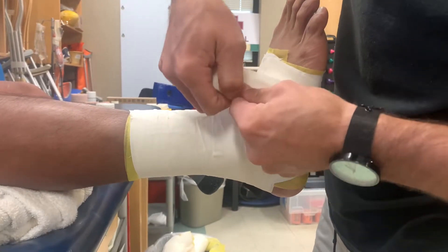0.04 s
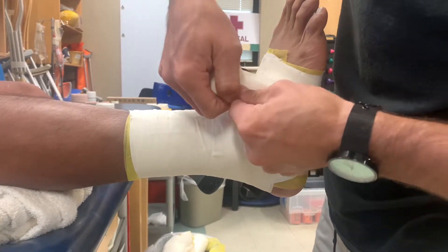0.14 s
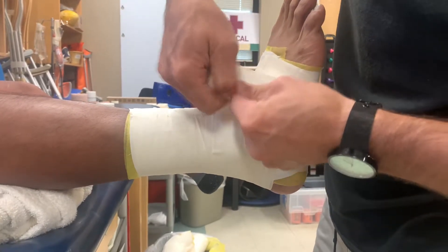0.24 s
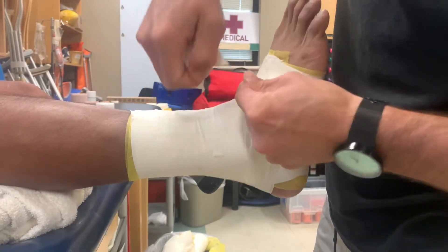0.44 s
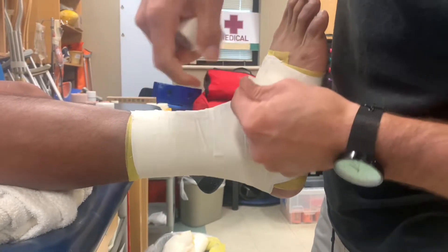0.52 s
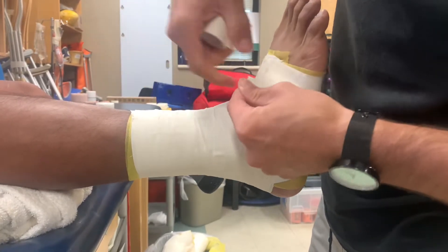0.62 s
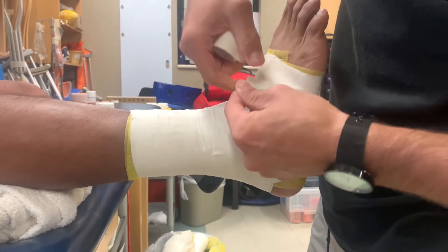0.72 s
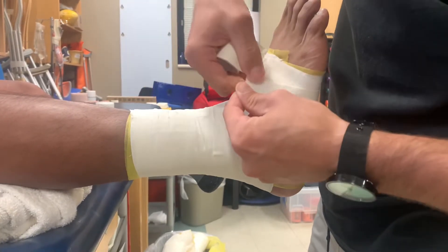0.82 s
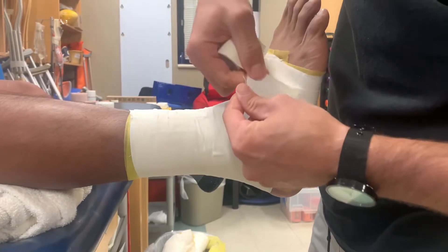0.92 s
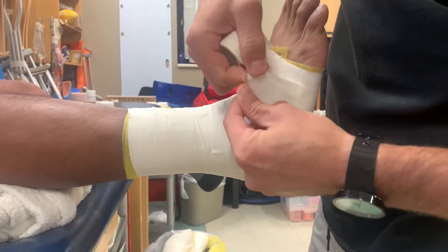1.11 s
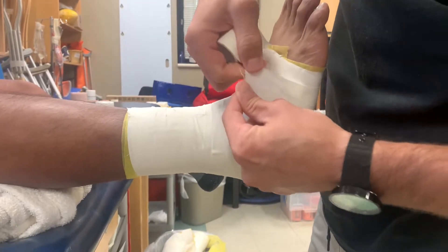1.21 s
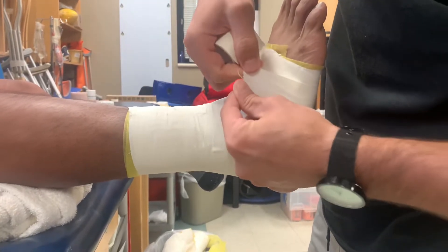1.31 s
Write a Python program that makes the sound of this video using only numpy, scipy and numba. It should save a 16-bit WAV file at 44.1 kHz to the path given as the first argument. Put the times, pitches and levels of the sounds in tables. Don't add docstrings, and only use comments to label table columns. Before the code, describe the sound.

Cloth tape is torn by hand, close to a phone in a small room. Faint thread ticks come at about 0.05 to 0.16 s, then a sharp, crackling rip from 0.19 to 0.26 s, its tone dropping into a soft slap. Finger brushing trails off to about 0.45 s; light rubs and small ticks return from 0.75 to 1.05 s. Low, wavering ventilation rumble continues throughout.

```python
import sys
import numpy as np
from scipy import signal
from scipy.fft import rfft, irfft
from scipy.io import wavfile
from scipy.ndimage import uniform_filter1d
from numba import njit

SR = 44100
rng = np.random.default_rng(int(sys.argv[2]) if len(sys.argv) > 2 else 0)


def inscribe(sig):
    pcm = np.round(np.clip(np.atleast_2d(sig).T, -1, 1) * 32767)
    wavfile.write(sys.argv[1], SR, pcm.astype(np.int16))


def linear_from_db(decibels):
    return 10 ** (np.asarray(decibels, float) / 20)


N = 59535
T = np.arange(N) / SR
HZ = np.fft.rfftfreq(N, 1 / SR)

# [f/Hz, level/dB]
RUMBLE_COLOUR = [(20, -19.5), (35, -15), (65, 2), (85, -5), (160, -7.5), (250, -19.5), (320, -31.5),
                 (800, -53.5)]
# [f/Hz, level/dB]
HISS_COLOUR = [(300, 8), (800, -9), (2500, -9.5), (5000, -16), (7300, -16), (9500, -12.5), (11400, -10),
               (16000, -13)]
# [f/Hz, width/Hz, level/dB]
DUCT_RESONANCES = [
    (144.1, 3.7, -59),
    (11340, 250, -97.5),
]
# [t/s, level/dB]
AIR_FLOW = [(0.0, -75), (0.03, -39), (0.108, -68), (0.124, -41.5), (0.25, -50.5), (0.274, -62),
            (0.378, -41), (0.412, -59), (0.442, -41), (0.654, -45.5), (0.68, -41), (0.808, -49.5),
            (0.852, -41), (0.906, -52.5), (1.124, -39), (1.172, -50.5), (1.21, -43.5), (1.35, -50)]

# [f/Hz, phase ahead/rad, level/dB]
PORTS_TEAR = [(700, .1, -1), (1500, .6, 5), (2550, 3.1, -.5), (3550, 3.2, 0), (4300, 5.6, -3),
              (5400, 3.2, -5), (6800, 6.1, 0), (16000, -6.7, 0)]
# [f/Hz, phase ahead/rad, level/dB]
PORTS_ASIDE = [(600, 0, -1), (1300, 2.4, 4), (3700, 2.6, -1), (4300, 1.8, -3), (5900, 2.4, -6),
               (6900, 5.2, -2), (8500, 3.14, 0), (16000, -6.4, 0)]

# [t/s, length/s, level/dB, brightness/dB per octave]
FINGER_RUBS = [(0.04, 0.0037, -97, -7), (0.12, 0.0097, -71, -2), (0.156, 0.0047, -64.5, -17),
               (0.275, 0.064, -52, -2.5), (0.397, 0.0067, -50, 0), (0.446, 0.037, -93, -1),
               (.74, 0.044, -75.5, -2.5), (0.847, 0.021, -70.5, -5.9), (.862, 0.031, -61, -5.3),
               (0.909, .05, -71.5, 0.9), (0.965, 0.019, -55.5, -1.6), (1.002, 0.017, -75, -2.7),
               (1.035, 0.026, -76, 12)]
# [f/Hz, level/dB]
RUB_COLOUR = [(500, -30), (1100, -13.5), (2500, -3.5), (4500, -4), (7000, -10), (8800, -4), (11000, -4),
              (15700, -1)]
# [t/s, level/dB, f/Hz, ring/s]
TICKS = [
    (.0535, -64.5, 4500, .003),
    (.1285, -62.5, 4500, .004),
    (.1562, -50.5, 2600, .002),
    (.1562, -55.5, 8500, .001),
    (.1611, -50, 14500, .001),
    (.1612, -52, 8000, .001),
    (.8745, -39.5, 2700, .003),
    (.9925, -51, 2500, .003),
]
# [t/s, level/dB, f/Hz, ring/s]
PARTING_THREAD = [
    (.1621, -47, 14000, .0012),
    (.1621, -49, 8000, .001),
    (.1622, -53, 5200, .001),
    (.1623, -47, 2700, .0018),
]

THREAD_SPLITS = (3000, 7100, 8900)
# [f/Hz, level/dB]
THREAD_COLOUR = [(250, -29), (1200, -16.5), (2200, -0.5), (4000, -3.5), (5600, 0), (8500, -1), (11500, 1),
                 (15800, 0.5)]
# [t/s, level/dB]
RIP_FORCE = [
    (0.177, -73.5),
    (0.191, -53.5),
    (0.1967, -28.5),
    (0.199, -21),
    (0.21, -20.5),
    (.23, -18),
    (0.247, -27.5),
    (.256, -27),
    (0.262, -42),
]
# [t/s, level/dB, f/Hz, ring/s]
BUNDLE_SNAPS = [
    (.2015, -14.5, 12200, 0.0078),
    (.2119, -16, 4576, 0.0018),
    (.2208, -7.5, 8760, .002),
    (.2275, -11, 4030, .004),
    (.2287, -19.5, 3600, .004),
    (.2295, -16.5, 2261, 0.0028),
    (.2372, -19, 4240, .003),
    (.2535, -20.5, 7066, 0.0013),
]
# [t/s, level/dB, f/Hz, ring/s]
BRIGHT_SNAPS = [
    (.2053, -6.5, 9200, .0016),
    (.2064, -4, 8700, .0016),
    (.2074, -10, 8000, .0016),
    (.2086, -7.5, 7400, .0022),
    (.2192, -7, 3900, .002),
    (.229, -16, 13500, .0015),
    (.2315, -14, 9800, .0015),
    (.246, -18, 9500, .002),
]
# [t/s, level/dB, f/Hz, ring/s]
FLAP_SLAP = [
    (.236, -37.5, 504, 0.011),
    (.2466, -27, 1301, 0.0038),
    (.2482, -26, 613.8, 0.0047),
    (.2495, -27.5, 397.5, 0.0076),
    (.256, -36.5, 600, 0.013),
]


def level(x, db):
    return x * linear_from_db(db) / np.sqrt(np.mean(x ** 2))


def colour(x, table, tilt_db=0.):
    hz, db = np.array(table, float).T
    octave = np.log2(np.maximum(HZ, 1))
    gain_db = np.interp(octave, np.log2(hz), db, left=-90, right=-90)
    gain_db = gain_db + tilt_db * (octave - np.log2(5000))
    return level(irfft(rfft(x) * linear_from_db(gain_db), N), 0)


@njit
def resonator(x, hz, q):
    out, band, low = np.empty(len(x)), 0., 0.
    for i in range(len(x)):
        g = np.tan(np.pi * hz[i] / SR)
        v = (band + g * (x[i] - low)) / (1 + g * (g + 1 / q))
        band, low = 2 * v - band, low + 2 * g * v
        out[i] = v / q
    return out


def rings(table):
    out = np.zeros(N)
    for (start_s, db, hz, ring_s), phase in zip(table, rng.random(len(table))):
        since = T - start_s
        age = np.clip(1 + since / ring_s * np.log(1000), 0, None)
        swell = np.e * age * np.exp(-age)
        cycles = hz * since * (1 - .006 * age) + phase
        out += linear_from_db(db) * swell * np.sin(2 * np.pi * cycles)
    return out


def clicks(per_s, scatter_db):
    hit = rng.random(N) < per_s / SR
    size = linear_from_db(scatter_db * np.minimum(rng.exponential(size=N), 4))
    return hit * rng.choice([-1, 1], N) * size


def crackle(per_s, scatter_db):
    parts = [rfft(clicks(per_s, scatter_db)) for _ in range(len(THREAD_SPLITS) + 1)]
    return irfft(np.choose(np.searchsorted(THREAD_SPLITS, HZ), parts), N)


def ports(x, table):
    hz, rad, db = np.array(table, float).T
    gap = np.interp(HZ, hz, rad)
    gap = gap - .42 * np.sin(2 * gap)
    turn = np.exp(.5j * gap) * linear_from_db(np.interp(HZ, hz, db) / 2)
    return np.array([irfft(rfft(x) * turn, N), irfft(rfft(x) / turn, N)])


def diffuse(common, left, right):
    loose = linear_from_db(-1.5) / np.sqrt(1 + (HZ / 6300) ** 20)
    shared = irfft(rfft(common) * np.sqrt(np.clip(1 - loose ** 2, 0, 1)), N)
    unrelated = irfft(rfft(np.array([left, right])) * loose, N)
    return ports(shared, PORTS_ASIDE) + unrelated


def duct():
    pitch_hz, wander, wander_per_s = 49.4, .07, 17
    hold = int(SR / wander_per_s)
    steps = np.repeat(rng.standard_normal(N // 1000 + 1), hold)[:N]
    walk = uniform_filter1d(steps, hold)
    s, db = np.array(AIR_FLOW).T
    cycles = np.cumsum(pitch_hz * (1 + wander * walk)) / SR
    return linear_from_db(np.interp(T, s, db) + 4.5) * np.sin(2 * np.pi * cycles)


def ventilation():
    rumble_db, side_db, left_db, hiss_db = -41.5, -22.5, -2.2, -79.5
    mid = colour(rng.standard_normal(N), RUMBLE_COLOUR) * linear_from_db(rumble_db - 8.5) + duct()
    for hz, width_hz, db in DUCT_RESONANCES:
        tone = resonator(rng.standard_normal(N), np.full(N, 1. * hz), hz / width_hz)
        mid = mid + level(tone, db)

    side = colour(rng.standard_normal(N), RUMBLE_COLOUR)
    tilt_db = np.clip(3.5 * np.log2(np.maximum(HZ, 1) / 60), -4, 22)
    side = irfft(rfft(side) * linear_from_db(tilt_db), N) * linear_from_db(rumble_db + side_db)
    low = np.array([linear_from_db(left_db) * (mid + side), mid - side])

    hiss = diffuse(*(colour(rng.standard_normal(N), HISS_COLOUR) for _ in range(3)))
    swell_db = 10 * (T - 0.87) ** 2
    return low + hiss * linear_from_db(hiss_db + swell_db)


def room(x):
    t60_s, treble_t60_s, build_up_s, echo_db = 0.29, 0.073, 0.0053, -17
    age = T[:SR // 2]
    lowpass = signal.butter(1, 4000, fs=SR, output="sos")
    echoes = []
    for _ in range(3):
        noise = rng.standard_normal(len(age))
        low = signal.sosfilt(lowpass, noise)
        tail = low * linear_from_db(-60 * age / t60_s) + (noise - low) * linear_from_db(-60 * age / treble_t60_s)
        tail = tail * np.clip(age / build_up_s, 0, 1)
        echoes.append(signal.fftconvolve(x, tail / np.sqrt(np.sum(tail ** 2)))[:N])
    return linear_from_db(echo_db) * diffuse(*echoes)


def fingers():
    rise_s, fall_s = 0.0032, 0.024
    out = rings(TICKS) + rings(PARTING_THREAD)
    grains = crackle(per_s=9000, scatter_db=4.5)
    for start_s, length_s, db, tilt_db in FINGER_RUBS:
        rise = np.minimum((T - start_s) / rise_s, 0)
        fall = np.maximum((T - start_s - length_s) / fall_s, 0)
        brush = colour(grains, RUB_COLOUR, np.clip(tilt_db, -2.5, 4))
        out = out + linear_from_db(db) * np.exp(rise - fall) * brush
    return out


def flap(threads):
    start_s, start_hz, halves_s = .205, 9200, 0.016
    hz = np.clip(start_hz * 2 ** (-(T - start_s) / halves_s), 350, 15000)
    ring = resonator(threads, hz, 0.83)
    return ring / np.sqrt(uniform_filter1d(ring ** 2, size=800) + 1e-12)


def rip():
    threads = crackle(per_s=6600, scatter_db=2)
    s, db = np.array(RIP_FORCE).T
    force = linear_from_db(np.interp(T, s, db, left=-140, right=-140))
    tearing = force * (colour(threads, THREAD_COLOUR) + linear_from_db(-15.5) * flap(threads))
    return tearing + rings(BUNDLE_SNAPS) + rings(BRIGHT_SNAPS) + rings(FLAP_SLAP)


def scene():
    tear, hands = rip(), fingers()
    near = tear + hands
    direct = ports(tear, PORTS_TEAR) + ports(hands, PORTS_ASIDE)

    scatter = np.diff(uniform_filter1d(rng.standard_normal((2, 100)), size=7))
    scatter = level(scatter, -29)
    direct = direct + signal.fftconvolve(near[None], scatter, axes=1)[:, :N]

    duck_db, duck_at_s, back_s = -2, 0.15, .1
    recovery = np.exp(-np.maximum(T - duck_at_s, 0) / back_s)
    duck = uniform_filter1d(linear_from_db(duck_db * (T > duck_at_s) * recovery), size=400)
    return direct + room(near) + duck * ventilation()


def band_limit(x):
    return signal.sosfilt(signal.butter(12, 16810, fs=SR, output="sos"), x)


def record(dry):
    top_cut = signal.ellip(8, .2, 60, 16000, fs=SR, output="sos")
    mix = signal.sosfilt(top_cut, dry)
    return band_limit(mix)


dry = scene()
out = record(dry)
inscribe(out)
```